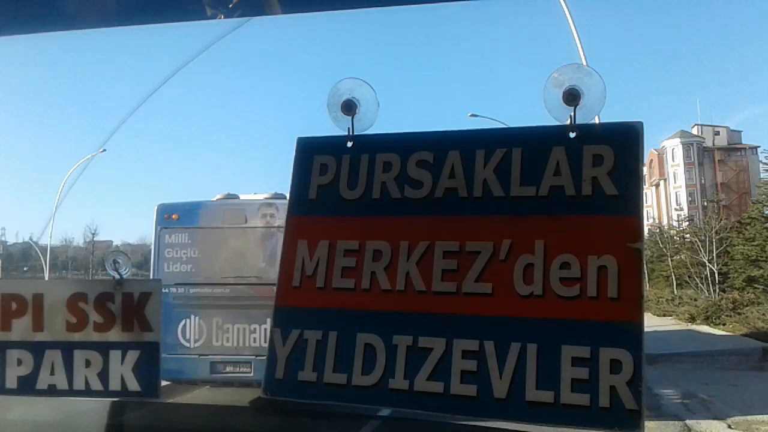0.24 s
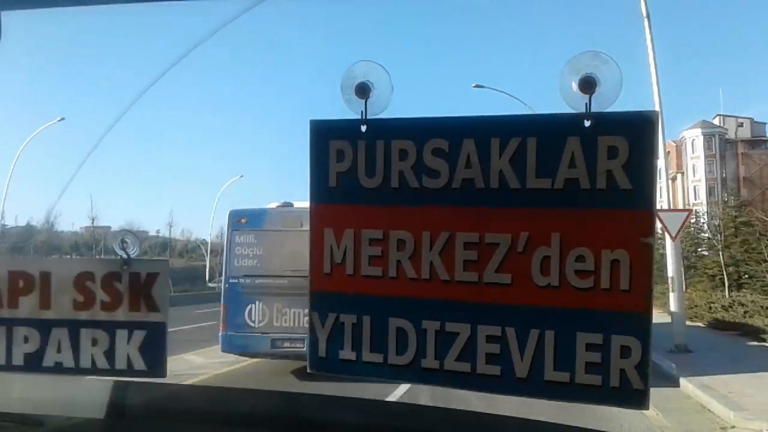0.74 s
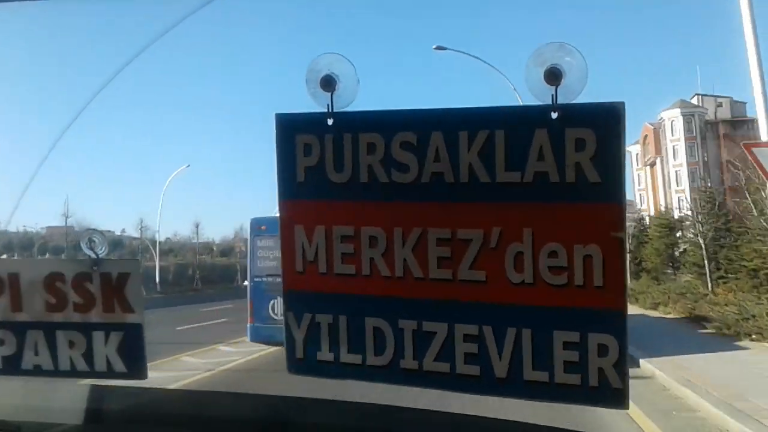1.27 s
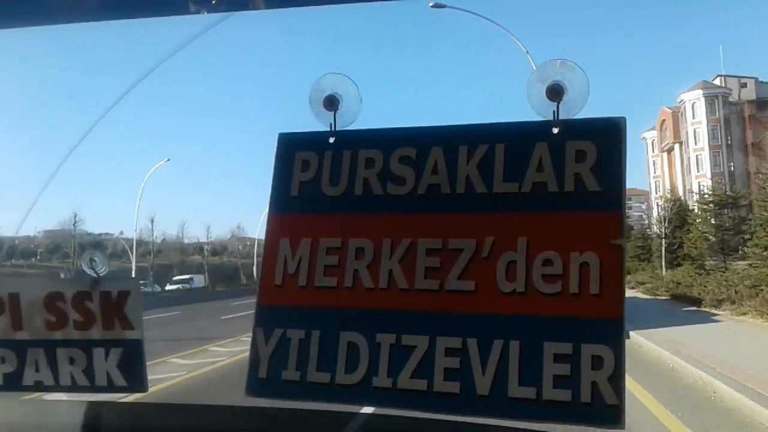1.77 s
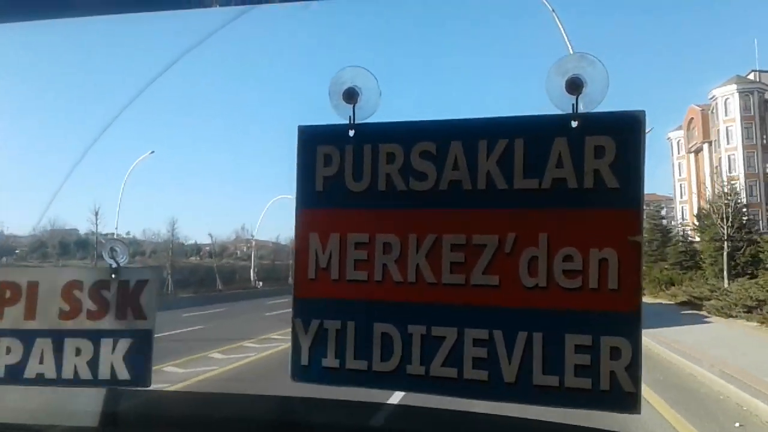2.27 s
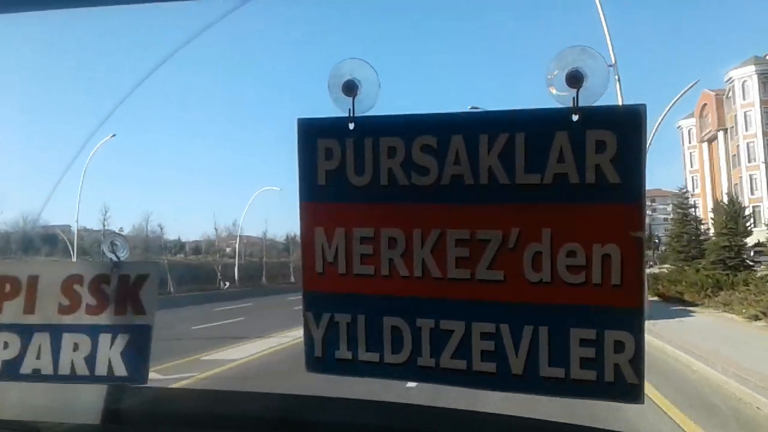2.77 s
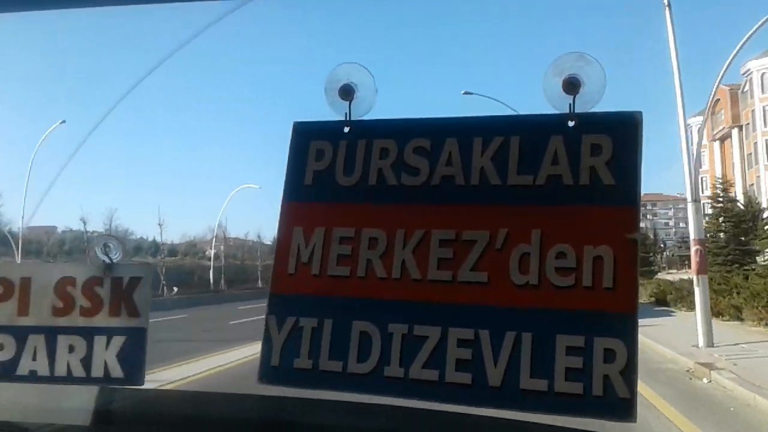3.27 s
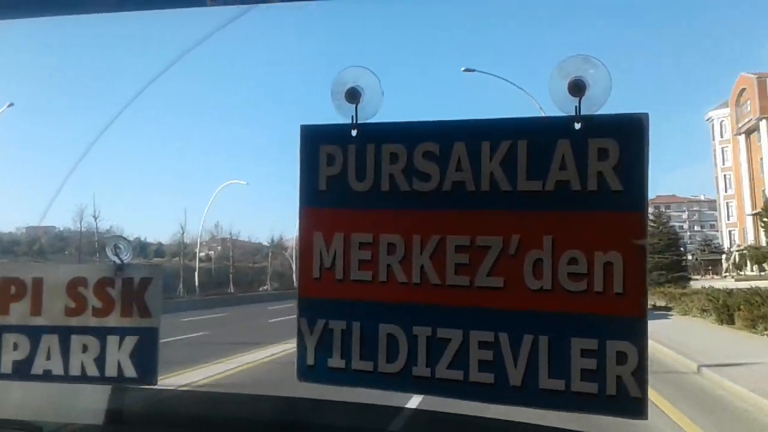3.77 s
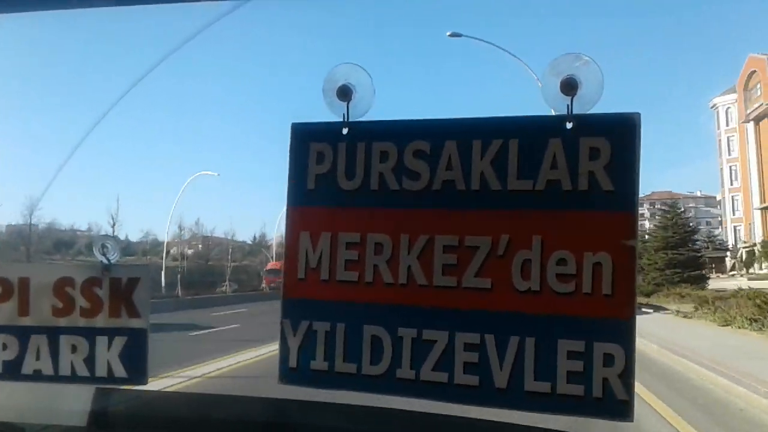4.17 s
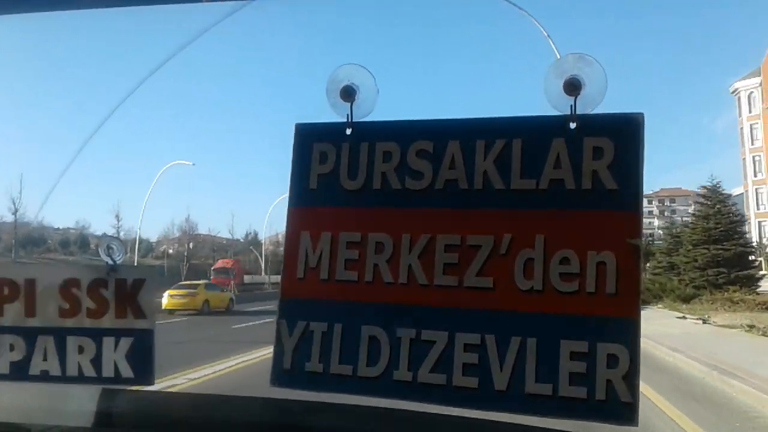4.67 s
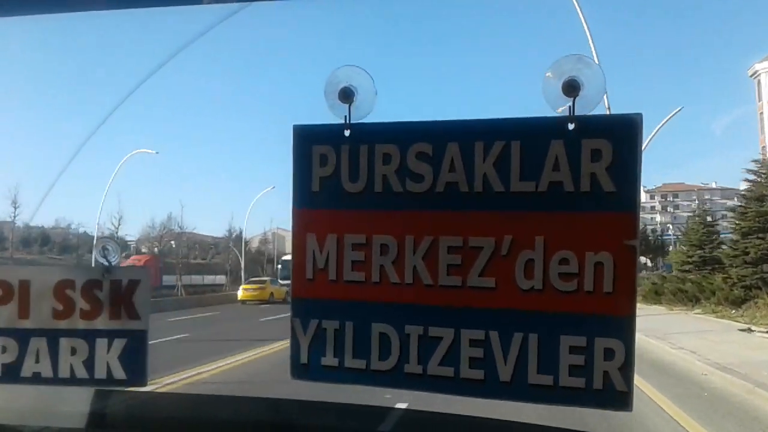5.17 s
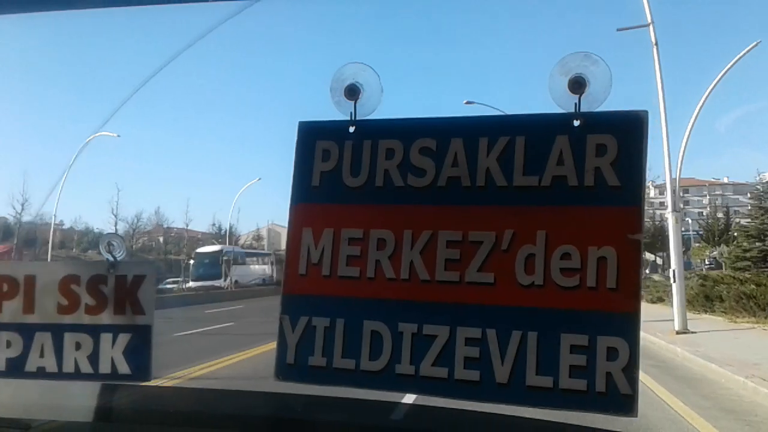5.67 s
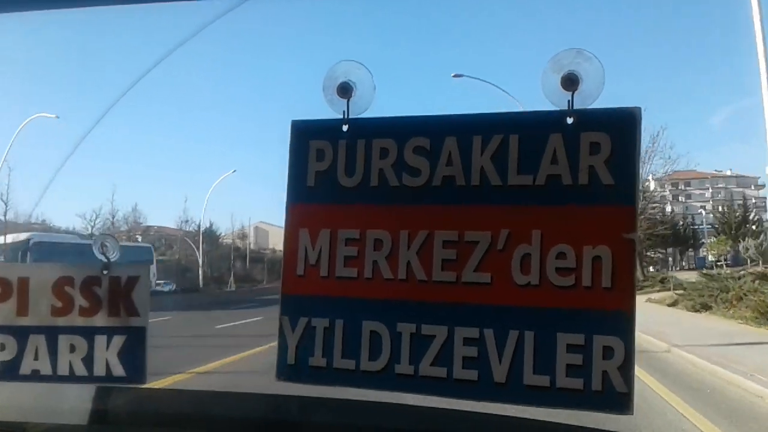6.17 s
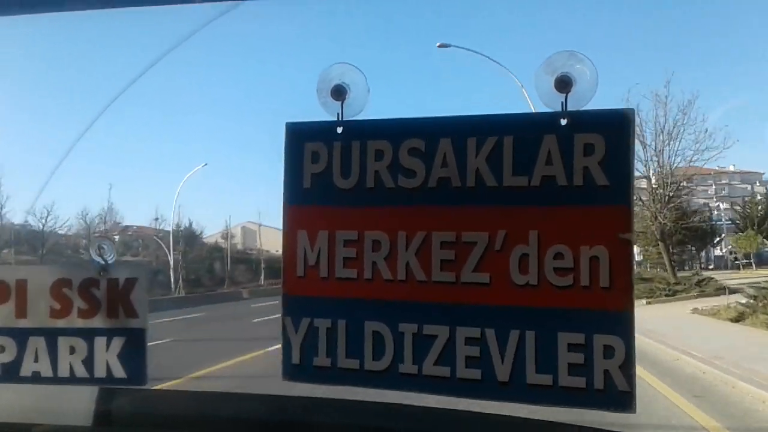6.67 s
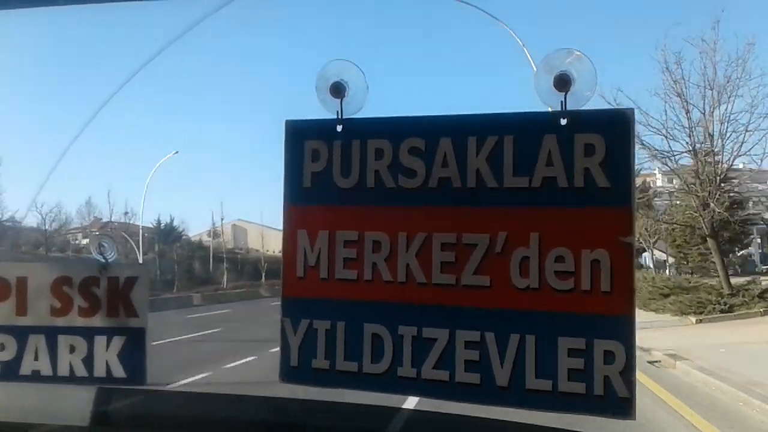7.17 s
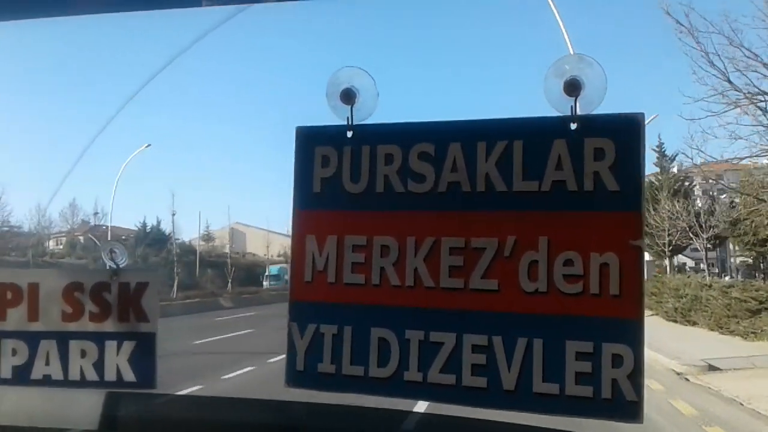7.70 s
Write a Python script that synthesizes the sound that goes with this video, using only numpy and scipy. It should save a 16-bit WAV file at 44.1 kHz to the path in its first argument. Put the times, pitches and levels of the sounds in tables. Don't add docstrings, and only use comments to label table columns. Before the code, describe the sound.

A four-cylinder diesel pulls steadily, heard inside a moving minibus cab through a small, slightly dull microphone. Low booming hum and mid-range clatter dominate, with broad road roar beneath. The pitch creeps up slightly, then holds. Floor drumming swells briefly around three seconds and again, more gently, near six. Thin gear whine, faint airy turbo whistle and a few tiny plastic ticks lie on top.

```python
import sys
import numpy as np
from scipy import signal
from scipy.fft import rfft, irfft
from scipy.io import wavfile
from scipy.ndimage import uniform_filter1d, minimum_filter1d, map_coordinates

SR = 44100
rng = np.random.default_rng(int(sys.argv[2]) if len(sys.argv) > 2 else 0)


def to_linear_factor(level_db):
    exponent = np.asarray(level_db, float) / 20
    return 10 ** exponent


def output_pcm(signal):
    pcm = np.clip(np.atleast_2d(signal).T, -1, 1) * 32767
    wavfile.write(sys.argv[1], SR, np.round(pcm).astype(np.int16))


N = 350154
T = np.arange(N) / SR


def evened(x):
    return x / np.sqrt(np.mean(x ** 2) + 1e-20)


def curve(rows, column):
    rows = np.asarray(rows)
    return np.interp(T, rows[:, 0], rows[:, column])


def coloured(x, points):
    f, db = np.transpose(points)
    hz = np.fft.rfftfreq(N, 1 / SR)
    gain_db = np.interp(np.log(hz + 1), np.log(f + 1), db)
    return evened(irfft(rfft(x) * to_linear_factor(gain_db), N))


def drift(top_hz):
    coarse_s = T[::256]
    hz = np.geomspace(.2, top_hz, 24)[:, None]
    waves = np.sin(2 * np.pi * (hz * coarse_s + rng.random((24, 1)))) / np.sqrt(hz)
    return np.interp(T, coarse_s, evened(waves.sum(0)))


def resonate(x, hz, width_hz):
    turn = np.exp(2j * np.pi * np.cumsum(hz) / SR)
    r = np.exp(-np.pi * width_hz / SR)
    return 2 * (turn * signal.lfilter([1 - r], [1, -r], x / turn)).real


def tone(turns, rms_db):
    level = np.interp(T, T[::128], np.sqrt(2) * to_linear_factor(rms_db[::128]))
    return level * np.sin(2 * np.pi * (turns + rng.random()))


# t/s, firing rate/Hz
SPEED = [(0.0, 69.27), (0.4, 69.49), (0.85, 69.96), (1.05, 69.98), (1.4, 70.4), (1.72, 70.2), (2.17, 70.98),
         (2.4, 70.87), (2.8, 71.6), (3.25, 71.8), (3.6, 72.13), (4.0, 72.05), (5.4, 72.08), (5.8, 72.48),
         (6.4, 72.63), (7.0, 72.45), (7.45, 72.4), (7.94, 72.08)]


def firing_hz():
    return curve(SPEED, 1)


def fast():
    return np.clip((firing_hz() - 69.8) / 2.3, -.2, 1.2)


# t/s, load/dB, whistle f/Hz
LOAD = [(0.0, -22.5, 11100), (0.84, -21.5, 11000), (1.59, -22, 10800), (2.32, -20.5, 11000),
        (2.65, -21, 11200), (3.6, -20.5, 10960), (4.05, -22.5, 10860), (4.4, -22, 10800),
        (5.26, -23, 10600), (5.86, -21, 11100), (6.55, -21, 10900), (7.05, -22, 10600),
        (7.47, -22.5, 10440), (7.94, -24, 10500)]


def load_db():
    return curve(LOAD, 1)


def whistle_hz():
    return curve(LOAD, 2)


def effort():
    return load_db() + 21.5


def knock(cycles, depth):
    firing = np.cos(2 * np.pi * 4 * cycles)
    limp = np.cos(2 * np.pi * 6 * cycles + 0.82)
    return 1 + depth * firing + 0.84 * depth * limp


def replayed(cycles, memory_cycles):
    keep = np.exp(-1 / memory_cycles)
    wave = signal.lfilter([1], [1, -keep], rng.standard_normal((220, 2048)), axis=0)[70:]
    lines = rfft(wave, axis=1)
    wave = irfft(lines / abs(lines) ** .15, axis=1)
    position = [np.floor(cycles), (cycles % 1) * 2047]
    return evened(map_coordinates(wave, position, order=1))


# f/Hz, level/dB
ROAR_SPECTRUM = [(15, -16), (30, -21), (40, -11), (55, -12), (80, -8), (98, 1), (118, -4.5), (180, -7),
                 (225, -3), (255, -7), (330, -11.5), (400, -17.5), (600, -14), (1000, -16), (1500, -18),
                 (2500, -24.5), (3500, -30.5), (4800, -35.5), (6500, -34.5), (7400, -50), (8500, -83)]


def roar(cycles):
    hiss = rng.standard_normal(N) * knock(cycles, 0.052)
    level_db = -18.5 + 0.49 * (load_db() + 19.0) + .5 * drift(17.0)
    return to_linear_factor(level_db) * coloured(hiss, ROAR_SPECTRUM)


# f/Hz, level/dB
PAN_SPECTRUM = [(400, -6.5), (650, -10.5), (780, -1.5), (900, -2.5), (1000, -4.5), (1150, -18),
                (2000, -60.5)]
# middle t/s, half length/s, gain/dB
ROUGH_ROAD = [
    (2.9, 0.29, 10.5),
    (3.597, 0.54, 5.5),
    (6.1, 0.75, 6),
]


def floor_pan(cycles):
    shake = replayed(cycles, 12) + .4 * rng.standard_normal(N)
    road_db = sum(db * np.exp(-((T - mid_s) / half_s) ** 2) for mid_s, half_s, db in ROUGH_ROAD)
    level_db = -29.5 - 1 * T + road_db
    return to_linear_factor(level_db) * coloured(shake * knock(cycles, 0.28), PAN_SPECTRUM)


# t/s, peak level/dB
TICKS = [
    (1.1786, -36),
    (1.486, -43),
    (1.848, -42),
    (3.036, -46),
    (4.256, -45),
    (4.407, -45),
    (4.45, -46),
    (4.82, -47),
    (5.456, -46),
    (5.94, -46),
]


def ticks():
    out, t = np.zeros(N), T[:600]
    high = signal.butter(3, [9000., 13000.], "bandpass", fs=SR, output="sos")
    decay = to_linear_factor(-60 * t / .006) + .2 * to_linear_factor(-60 * t / .04)
    for s, peak_db in TICKS:
        click = signal.sosfilt(high, rng.standard_normal(600) * decay)
        part = out[round(s * SR):][:600]
        part += to_linear_factor(peak_db) * click[:len(part)] / abs(click).max()
    return out


# f/Hz, level/dB
AIR_SPECTRUM = [(6000, -26), (7500, 1), (8400, -4), (9050, -3), (9700, -10.5), (12000, -4.5), (13200, -6.5),
                (14300, -15.5), (16000, -17)]


def turbo():
    gusts_db = 1.2 * evened(uniform_filter1d(uniform_filter1d(rng.standard_normal(N), 900), 900))
    hz = whistle_hz()
    whistle = rng.standard_normal(N)
    for _ in range(3):
        whistle = resonate(whistle, hz, width_hz=1900.)
    air = coloured(rng.standard_normal(N), AIR_SPECTRUM)
    level_db = -58.5 + .7 * effort() + 2 * (hz / 1000 - 11) + gusts_db
    air_db = -59.5 + .6 * (level_db + 57.5)
    return to_linear_factor(level_db - 2.5) * evened(whistle) + to_linear_factor(air_db) * air


WHINE_HZ = [492.5, 497, 503, 509, 512.3, 516]
WHINE_DB = [-26.5, -34.5, -36.5, -27.5, -34.5, -38]


def whine(cycles):
    order = 28.43
    panel_db = np.interp(order * firing_hz() / 4, WHINE_HZ, WHINE_DB)
    return tone(order * cycles + 0.045 * drift(5.5), panel_db + 0.3 * drift(9.5))


# f/Hz, level/dB
CLATTER_SPECTRUM = [(300, -30.5), (450, -4.5), (800, -9), (1060, -8), (1150, -3.5), (1350, -3), (1550, -1),
                    (1750, -6), (1910, -3.5), (2250, -6), (2560, -8.5), (2750, -11.5), (4500, -33),
                    (9000, -78)]


def clatter(cycles):
    strikes = replayed(cycles, 28) * knock(cycles, 0.14)
    return to_linear_factor(load_db() - 1.8) * coloured(strikes, CLATTER_SPECTRUM)


# multiple of cycle, slow level/dB, fast level/dB
UNEVEN = [(2, -50, -46), (5, -37, -30), (6, -31.5, -37), (7, -36, -26.5), (9, -37, -42), (10, -35, -33),
          (11, -40, -37), (13, -34, -41), (14, -36.5, -40), (15, -37, -30.5), (37, -42, -43),
          (17, -46, -46), (18, -39, -48), (19, -40, -41.5), (22, -44, -43), (23, -43, -43), (27, -41, -42),
          (32, -43, -40), (34, -41, -43), (36, -41, -45)]
# multiple of cycle, slow level/dB, fast level/dB
FURTHER_ORDERS = [(21, -43.3, -37.0), (24, -37.4, -39.0), (25, -36.8, -41.6), (26, -37.7, -45.0),
                  (30, -46.6, -36.5), (35, -48.0, -38.3), (39, -41.3, -40.4), (40, -49.1, -34.6),
                  (44, -35.2, -40.4), (48, -33.8, -40.5), (52, -39.0, -42.5), (53, -42.9, -43.1),
                  (62, -50.0, -44.3), (63, -47.2, -35.1), (64, -42.6, -38.7), (65, -42.0, -50.0),
                  (67, -38.1, -40.0), (68, -32.7, -33.5), (69, -44.0, -40.0), (72, -44.5, -42.7),
                  (73, -50.0, -36.1), (76, -38.1, -38.9), (80, -36.4, -40.8), (82, -41.2, -37.8),
                  (83, -48.7, -37.2), (84, -40.4, -40.3), (89, -50.0, -39.9), (98, -48.5, -40.9),
                  (102, -42.5, -44.2), (106, -45.8, -39.5)]


def orders(cycles):
    share, pull_db = fast(), 0.67 * effort()
    out = np.zeros(N)
    for k, slow_db, fast_db in list(UNEVEN) + list(FURTHER_ORDERS):
        speed_db = slow_db + (fast_db - slow_db) * share
        out += tone(round(k) * cycles, 0.12 + speed_db + pull_db + 0.96 * drift(1.488))
    return out


# multiple of firing, slow level/dB, fast level/dB, load slope/(dB/dB)
BOOM = [(1, -18.7, -20, .3), (2, 0, 0, -.5), (3, -22, -20.3, 1.1), (4, -33.5, -34.5, .6),
        (5, -29, -27.8, .8)]
LAG = [(0, 0), (.05, .25), (.57, .62), (.5, .36), (.82, .76)]
CABIN_HZ = [138.6, 140.5, 142, 143.4, 144.3, 144.85, 145.2]
CABIN_DB = [-11, -12.2, -13, -15.5, -18, -20.5, -23]


def boom(cycles):
    share = fast()
    cabin_db = np.interp(2 * firing_hz(), CABIN_HZ, CABIN_DB)
    out = np.zeros(N)
    for (k, slow_db, fast_db, pull), (slow_lag, fast_lag) in zip(BOOM, LAG):
        k = round(k)
        db = slow_db + (fast_db - slow_db) * share + pull * effort() + 0.18 * drift(8.5)
        if k == 2:
            db = db + cabin_db
        lag = slow_lag + (fast_lag - slow_lag) * share
        out += np.sqrt(2) * to_linear_factor(db) * np.cos(2 * np.pi * (4 * k * cycles - lag))
    return out


def scene():
    cycles = np.cumsum(firing_hz()) / SR / 4
    surroundings = roar(cycles) + floor_pan(cycles) + ticks()
    engine = turbo() + whine(cycles) + clatter(cycles) + orders(cycles) + boom(cycles)
    return (surroundings + engine)[None]


def roll_off(x):
    return signal.sosfilt(signal.butter(12, 15720, fs=SR, output="sos"), x)


def record(dry):
    room = minimum_filter1d(np.minimum(.9 / (abs(dry) + 1e-9), 1), 301, axis=1)
    gain = uniform_filter1d(uniform_filter1d(room, 150, axis=1), 150, axis=1)
    return roll_off(dry * gain)


dry = scene()
out = record(dry)
output_pcm(out)
```